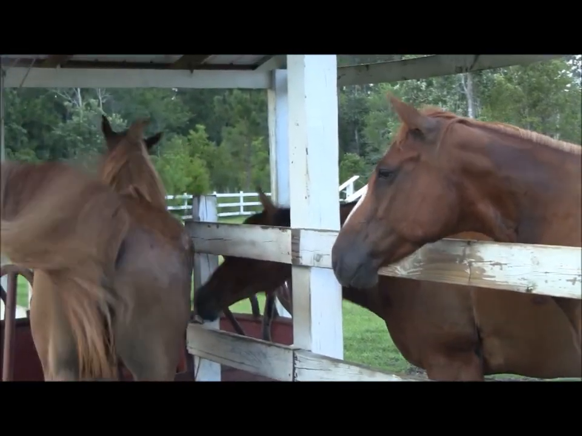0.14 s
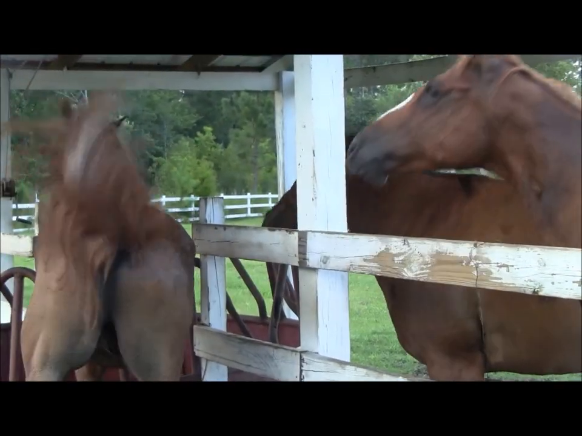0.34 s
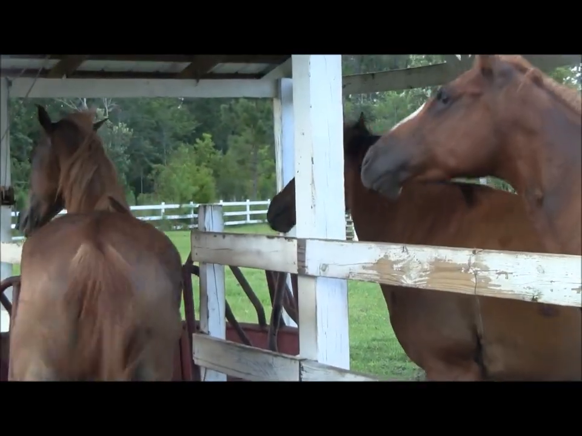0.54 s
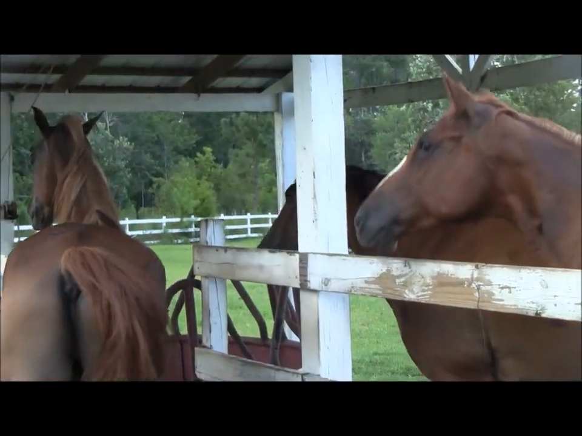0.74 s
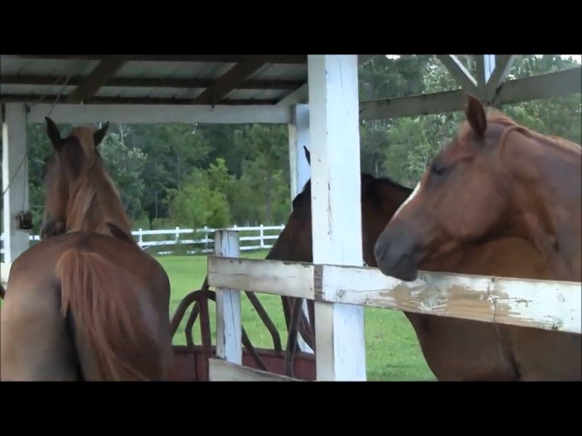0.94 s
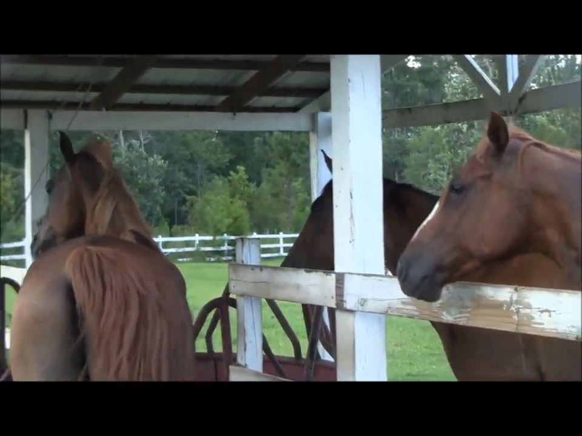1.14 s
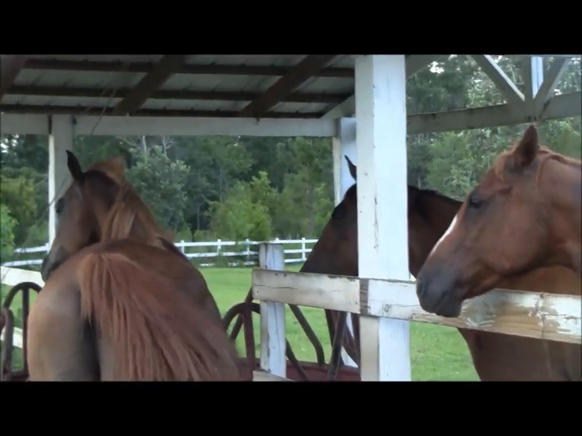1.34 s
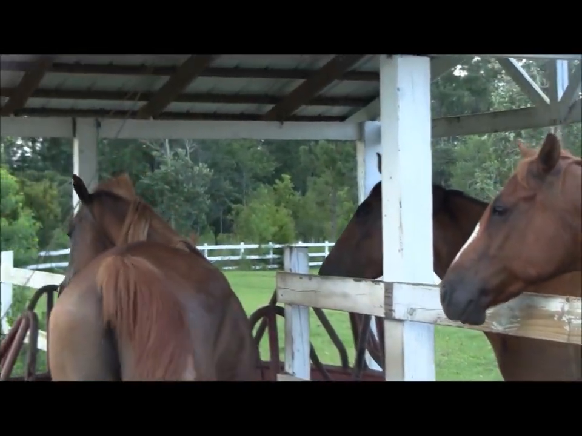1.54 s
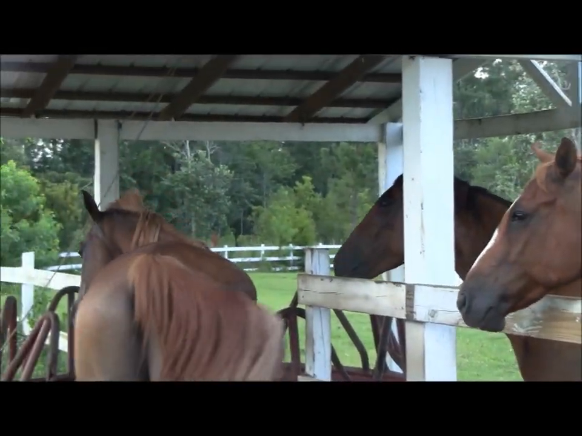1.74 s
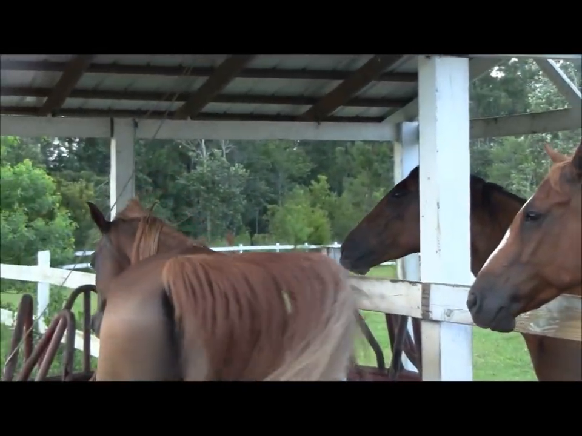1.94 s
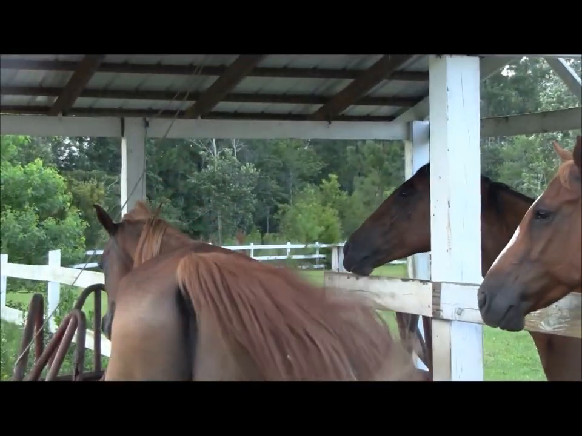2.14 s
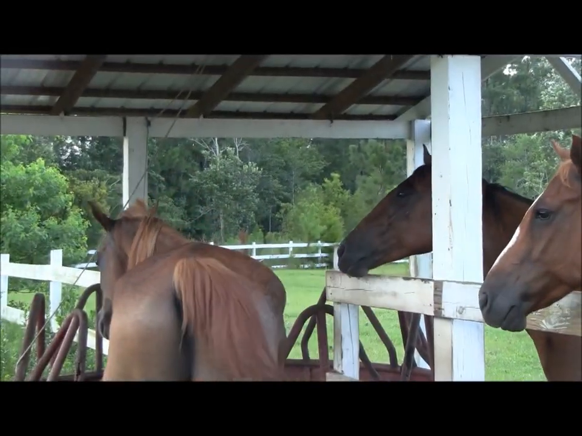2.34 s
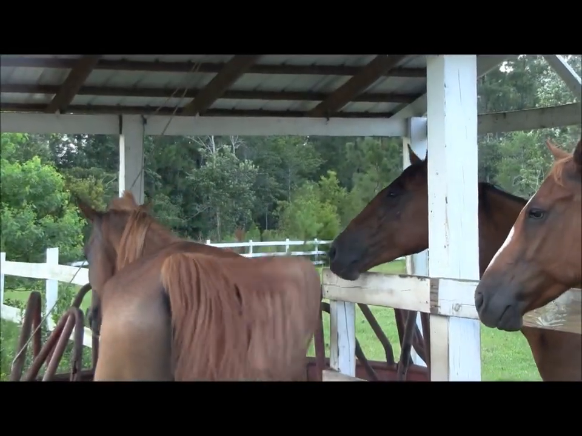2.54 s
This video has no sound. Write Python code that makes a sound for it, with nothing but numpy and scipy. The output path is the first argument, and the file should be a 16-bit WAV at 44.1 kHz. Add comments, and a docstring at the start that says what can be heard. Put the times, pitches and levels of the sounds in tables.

```python
"""Under an open shelter by a pasture, a horse squeals once: a rush of air, a falling whistle, a rasp, two squeaks.
The voice is a stack of harmonics with unsteady pitch and breath noise; sparse reflections follow it.
Insects buzz as short falling chirps over a hiss, tails swish as bursts of noise, and a distant rumble
and open-air wash of filtered noise lie underneath.
Automatic gain control ducks the whole sound at the squeal, and the background comes back slowly."""
import sys
import numpy as np
from scipy import signal
from scipy.fft import rfft, irfft
from scipy.io import wavfile
from scipy.ndimage import uniform_filter1d

SR = 44100
rng = np.random.default_rng(int(sys.argv[2]) if len(sys.argv) > 2 else 0)


def inscribe(sig):
    """Save sig as 16-bit PCM at rate SR to the path in sys.argv[1].

    A 1-D sig is mono; a 2-D sig holds one channel per row.
    Samples are clipped to [-1, 1] before scaling.
    """
    pcm = np.round(np.clip(np.atleast_2d(sig).T, -1, 1) * 32767)
    wavfile.write(sys.argv[1], SR, pcm.astype(np.int16))


N = 114660
TIME = np.arange(N) / SR  # seconds

# throat colour of the breath noise: frequency_hz, relative_level_db
THROAT_COLOUR = [(100, -58), (280, -36), (355, -15), (430, -7), (560, 2), (700, -1), (780, -4.5),
                 (940, 3.5), (1220, -7), (1600, -1), (1780, 4), (2000, -17.5), (2150, -28), (2500, -12),
                 (2900, -32), (3700, -25.5), (5200, -40), (7000, -42), (14000, -59)]


def amp(db):
    """Turns decibels into a plain multiplier."""
    return 10 ** (np.asarray(db) / 20)


def unit(x):
    """Scales a sound to an average strength (rms) of 1."""
    return x / np.sqrt(np.mean(x ** 2) + 1e-20)


def read(points, hz):
    """Reads a table of frequencies and values between its points, on a log-frequency axis."""
    f, value = np.transpose(points)
    return np.interp(np.log(hz + 1), np.log(f + 1), value)


def colour(x, points):
    """Filters a sound by a table of frequencies and levels, then scales it to rms 1."""
    gain = amp(read(points, np.fft.rfftfreq(N, 1 / SR)))
    return unit(irfft(rfft(x) * gain, N))


def wander(hz):
    """Smooth random movement, mostly slower than the given rate, at rms 1."""
    keep_slow = 1 / (1 + (np.fft.rfftfreq(N, 1 / SR) / hz) ** 4)
    return unit(irfft(rfft(rng.standard_normal(N)) * keep_slow, N))


def level(times, db):
    """Loudness that follows a dB curve, practically silent outside it."""
    return amp(np.interp(TIME, times, db, left=-150, right=-150))


def wide_noise(points):
    """Coloured stereo noise; mixing a middle and a side noise sets how alike the ears are at each frequency."""
    # likeness of left and right: frequency_hz, correlation (1 = same, 0 = unrelated, -1 = opposite)
    likeness = [(60, .985), (130, 0.97), (200, 0.94), (300, -0.25), (430, -0.26), (640, 0.15), (1000, 0.79),
                (1400, 0.85), (3100, 0.44), (5000, 0.56), (7000, 0.76), (8200, 1), (9400, -0.41),
                (11000, -0.14), (12500, 0.48), (15000, .2)]
    hz = np.fft.rfftfreq(N, 1 / SR)
    mid, side = rfft(rng.standard_normal((2, N)))
    same = np.clip(read(likeness, hz), -1, 1)
    mid = mid * np.sqrt(1 + same)
    side = side * np.sqrt(1 - same)
    return colour(irfft(np.array([mid + side, mid - side]), N), points)


def add(mix, start_s, sound):
    """Mixes a sound in from a given time."""
    first = max(round(start_s * SR), 0)
    part = mix[..., first:][..., :sound.shape[-1]]
    part += sound[..., :part.shape[-1]]


def pasture():
    """Distant low rumble and a wash of open air that swells early on, both noise of wavering level."""
    # rumble colour: frequency_hz, relative_level_db
    rumble_colour = [(25, -32), (42, -35), (58, -19.5), (85, -12.5), (115, -8), (138, 2), (167, -5.5),
                     (200, -1), (260, -6.5), (340, -8), (500, -21), (1000, -57)]
    # wash colour: frequency_hz, relative_level_db
    wash_colour = [(150, -37), (330, -10), (450, -6), (700, -1.5), (1000, -1), (1280, -0.5), (1550, -5.5),
                   (1900, -8), (2300, -14), (3100, -20), (4500, -23.5), (5400, -32), (6500, -26),
                   (9000, -53)]
    # loudness of the wash: time_s, level_db
    wash_level = [(0, -45), (.8, -41.5), (2.6, -42)]
    rumble = amp(-46.5 + 0.27 * wander(30)) * wide_noise(rumble_colour)
    wash_db = np.interp(TIME, *np.transpose(wash_level)) + 1.2 * wander(8.1)
    return rumble + amp(wash_db) * wide_noise(wash_colour)


def insects():
    """One near insect, its wing strokes short falling chirps in uneven pairs, over the hiss of many."""
    # hiss of the many insects: frequency_hz, relative_level_db
    chorus_colour = [(3000, -54.5), (4300, -27.5), (4700, -9), (5200, -24), (6500, -19), (7100, -1.5),
                     (7800, -1.5), (8500, -10), (9300, 1.5), (9900, 2.5), (10300, -6), (11000, -16.5),
                     (13000, -30.5), (15500, -42)]
    pair_s, offbeat, jitter_s = .0388, .4, .001  # offbeat: place of the second stroke, as a share of the pair
    chirp_hz, fall_hz_per_s, peak_s, chirp_db = 8120, 85000, .0017, -38.5
    near = np.zeros((2, N))
    t = np.arange(0, .012, 1 / SR)
    rise_and_die = (t / peak_s * np.exp(1 - t / peak_s)) ** 1.35
    for pair, draws in enumerate(rng.standard_normal((90, 2, 3))):
        for stroke, (late, sharp, loud) in enumerate(draws):
            start_hz = chirp_hz + 45 * sharp
            phase = 2 * np.pi * (start_hz * t - fall_hz_per_s * t ** 2 / 2)
            shape = amp(chirp_db + 0.43 * loud) * rise_and_die
            # the left ear is softer and .6 radians ahead
            ears = np.array([amp(-8.0) * np.sin(phase + .6), np.sin(phase)])
            add(near, (pair + stroke * offbeat) * pair_s + jitter_s * late, shape * ears)
    chorus = amp(-49 + 1.57 * wander(89)) * wide_noise(chorus_colour)
    return near + chorus


def movements():
    """Swishes of tails and coats as grainy noise swells, and small dry ticks, perhaps a hoof on litter."""
    # swishes: centre_s, half_length_s, hiss_db, body_db
    swishes = [(0.269, 0.048, -46, -61), (0.482, 0.067, -47, -39), (0.59, 0.034, -44, -46),
               (0.669, 0.067, -43, -40), (.79, .025, -55, -61), (0.995, 0.093, -66, -65),
               (1.397, .04, -50, -41), (1.515, 0.038, -49, -56), (1.96, 0.081, -54, -49.5),
               (2.492, .018, -56, -57)]
    # bright and dull parts of a swish: frequency_hz, relative_level_db
    hiss_colour = [(1000, -7), (3500, -3), (7000, -2), (11000, 5), (15500, -7.5)]
    body_colour = [(200, -26), (800, 2.5), (1800, -0.5), (3000, -11), (8000, -31)]
    # ticks: start_s, level_db
    tick_list = [(0.679, -36), (1.912, -35)]
    # tick colour: frequency_hz, relative_level_db
    tick_colour = [(30, -35), (300, -5), (1500, -2), (2600, 6), (3400, -8), (4500, -4.5), (7000, -10),
                   (11000, -5), (15000, -17)]
    tick_decay_s = 0.0067
    hiss, body, ticks = np.zeros((3, N))
    for centre_s, half_s, hiss_db, body_db in swishes:
        swell = np.exp(-((TIME - centre_s) / half_s) ** 2)
        hiss += amp(hiss_db) * swell
        body += amp(body_db) * swell
    for start_s, db in tick_list:
        ticks += amp(db) * (TIME > start_s) * np.exp(-abs(TIME - start_s) / tick_decay_s)
    grainy_hiss = hiss * wide_noise(hiss_colour) * amp(1.5 * wander(400))
    return grainy_hiss + body * wide_noise(body_colour) + ticks * wide_noise(tick_colour)


def voice(curve, harmonics, jitter, flutter_hz, flutter, halves, breath_db):
    """Vocal folds: roughness adds jitter, flutter, strong-weak cycles and breath puffs to unsteady overtones."""
    times, pitch_hz, db, overtones_db, rough = np.transpose(curve)
    rough = np.clip(np.interp(TIME, times, rough), 0, 1)
    bright = amp(np.interp(TIME, times, overtones_db))
    flutter_rate = flutter_hz * (1 + .22 * wander(74))
    flap = np.sin(2 * np.pi * np.cumsum(flutter_rate) / SR)
    shaky_hz = np.interp(TIME, times, pitch_hz) * (1 + jitter * rough * wander(195))
    phase = 2 * np.pi * np.cumsum(shaky_hz) / SR

    folds = amp(harmonics[0]) * np.cos(phase)
    for k, harmonic_db in enumerate(harmonics[1:], 1):
        unsteady = min(k / 2, 2)  # higher overtones waver more, up to a limit
        shimmer = amp(harmonic_db + 1.5 * unsteady * wander(53))
        blur = .65 * unsteady * wander(110)  # radians
        folds = folds + bright * shimmer * np.cos((k + 1) * phase + k * k + blur)
    # tones between the harmonics make every other cycle stronger
    half_tones = halves * rough ** 2 * (np.cos(3 * phase / 2) + np.cos(5 * phase / 2))
    # breath noise pulses once per cycle
    puffs = colour(rng.standard_normal(N) * (1 + 1.26 * np.cos(phase)), THROAT_COLOUR)
    sound = np.sqrt(2) * folds + half_tones + amp(breath_db) * rough * puffs
    return level(times, db) * sound * (1 + flutter * rough * flap)


def squeak(start_s, length_s, pitch_hz, db, second_db):
    """A short sagging note with breath, and a whistle at an unrelated pitch that outlasts it."""
    # strength of each harmonic, from the first up: relative_level_db
    strengths_db = [1, 4.5, -21, -14.5, -28, -22, -21, -23.5]
    progress = np.clip((TIME - start_s) / length_s, 0, 1)
    second_progress = np.clip((TIME - start_s) / (length_s * 1.25), 0, 1)
    # both tones share one sag of 3.5 percent and one shake
    turns = np.cumsum((1 - .035 * progress) * (1 + 0.0065 * wander(220))) / SR
    note = np.zeros(N)
    for k, harmonic_db in enumerate(strengths_db, 1):
        note += amp(harmonic_db) * np.sin(2 * np.pi * k * pitch_hz * turns)
    breath = .14 * amp(14.5) * colour(rng.standard_normal(N), THROAT_COLOUR)
    arch = abs(np.sin(np.pi * progress)) ** .7
    second_arch = abs(np.sin(np.pi * second_progress ** 1.1)) ** 0.91
    second = amp(second_db) * second_arch * np.sin(2 * np.pi * 1495 * turns)
    return amp(db) * arch * (note + breath) + second


def horse():
    """The squeal: coloured noise for the rush of air, then two voices for whistle and rasp, then squeaks."""
    # rush of air that opens the squeal: time_s, level_db
    rush_level = [(.115, -49.5), (.131, -35.5), (.15, -32), (.195, -40), (.215, -42)]
    # its colour: frequency_hz, relative_level_db
    rush_colour = [(80, -33), (200, -0.5), (450, -3), (750, -1.5), (1700, 0), (2200, -1), (2900, -1.5),
                   (5000, -15.5), (9000, -24.5), (15000, -31)]
    # clear first half, then hoarse lower half: time_s, pitch_hz, level_db, overtones_db, roughness (0-1)
    whistle_curve = [(.15, 744, -42, -2, 0.62), (.172, 661, -33, 14.5, 0.06), (.19, 639.8, -25.5, 21, 0.17),
                     (.198, 656.4, -26.5, 21.5, 0.06), (.206, 670.5, -44, 21, 0.25),
                     (.214, 669.8, -18, 1, .15), (.226, 676.3, -2.5, 0, 0.23),
                     (.238, 663.3, -8.5, 10.5, 0.69), (.258, 635, -10, 4.5, 0.6),
                     (.275, 624, -7.5, 6, 0.05), (.3, 619.5, -5.5, 1.5, 0.16), (.326, 606.7, -5, 8, 0.2),
                     (.336, 595, -8.5, -1, 0.42), (.346, 590, -51, -2, .4)]
    rasp_curve = [(.318, 519.6, -45, -2, 0.33), (.333, 511.6, -7, -4.5, 0.19), (.365, 504, -8, 0, 0.49),
                  (.405, 478.5, -9, -3.5, 0.52), (.422, 472.8, -11.5, -1, 0.66),
                  (.434, 508.8, -13, -0.5, 0.34), (.45, 502.5, -12.5, 3, .4),
                  (.462, 497.7, -20.5, -5.5, 0.94), (.478, 504.5, -23.5, -4, 0.54),
                  (.495, 500.4, -38, 12, 0.2), (.53, 508, -47, 3, .1), (.55, 500, -58, 8, .2)]
    # strength of each harmonic, from the first up: relative_level_db
    whistle_harmonics = [0, -15, -22.5, -30.5, -39, -45.5, -47, -52]
    rasp_harmonics = [-12, 5.5, -2, -16, -24, -30, -28, -33.5, -40, -59]
    # after-squeaks: start_s, length_s, pitch_hz, level_db, second_tone_db
    squeaks = [(0.592, 0.047, 570, -23, -15), (0.726, 0.024, 567, -32.5, -73)]
    rush = level(*np.transpose(rush_level)) * colour(rng.standard_normal(N), rush_colour)
    whistle = voice(whistle_curve, whistle_harmonics, jitter=0.056, flutter_hz=150, flutter=0.39,
                    halves=1.0, breath_db=-4)
    rasp = voice(rasp_curve, rasp_harmonics, jitter=0.035, flutter_hz=82, flutter=.72,
                 halves=0.44, breath_db=8.5)
    return rush + whistle + rasp + sum(squeak(*row) for row in squeaks)


def shelter(x):
    """Sparse reflections from roof, posts and trees, each band of pitch dying at its own speed."""
    # how long echoes last: frequency_hz, time_to_fall_60_db_s
    echo_times = [(200, 0.21), (1000, .5), (1600, .33), (5000, 0.82), (12000, 0.15)]
    # about 1500 random reflections a second, none in the first 6 ms
    chosen = rng.random((2, SR)) < 1500 / SR
    taps = rng.standard_normal((2, SR)) * chosen * (np.arange(SR) > .006 * SR)
    # shared reflections, plus weaker ones of opposite sign in the two ears
    taps = taps[0] + np.array([[1], [-1]]) * amp(-14.5) * taps[1]
    hz, t, bands = signal.stft(taps, SR, nperseg=256)
    fading = amp(-60 * t / read(echo_times, hz)[:, None])
    tail = signal.istft(bands * fading, SR, nperseg=256)[1]
    tail = tail / np.linalg.norm(tail[0])
    return amp(-13.5) * signal.fftconvolve(x[None], tail, axes=1)[:, :N]


def scene():
    """Adds the horse, very slightly to the left, its reflections and the background."""
    call = horse()
    direct = call * amp([[.2], [-.2]])
    return direct + shelter(call) + movements() + insects() + pasture()


def held(db, db_per_s):
    """Follows peaks at once and recovers at a steady rate."""
    fall = TIME * db_per_s
    return np.maximum.accumulate(db + fall) - fall


def record(dry):
    """Gain control turns loud sound down, with a slow and a quick recovery; then the top treble is cut."""
    power = abs(uniform_filter1d((dry ** 2).mean(0), size=500))
    over_db = np.maximum(10 * np.log10(power + 1e-12) + 13.5, 0)  # above a -13.5 dB threshold
    duck_db = 0.61 * held(over_db, db_per_s=2.97) + 0.44 * held(over_db, db_per_s=34.5)
    ducked = dry / amp(uniform_filter1d(duck_db, size=150))
    treble_cut = signal.firwin(511, 15700, window=("kaiser", 9), fs=SR)  # cutoff in Hz
    return signal.oaconvolve(ducked, treble_cut[None], "same")


dry = scene()
out = record(dry)
inscribe(out)
```